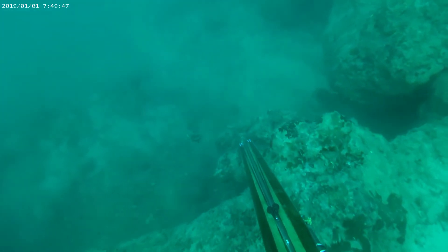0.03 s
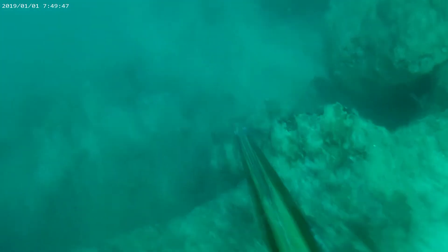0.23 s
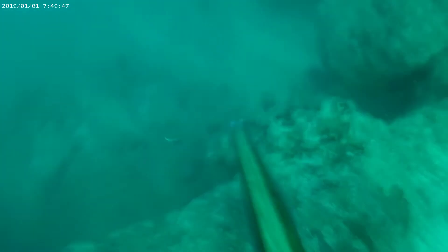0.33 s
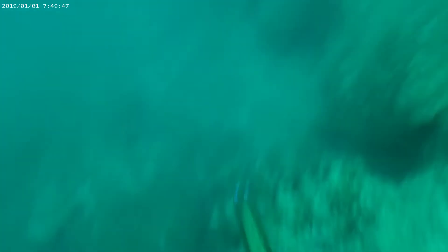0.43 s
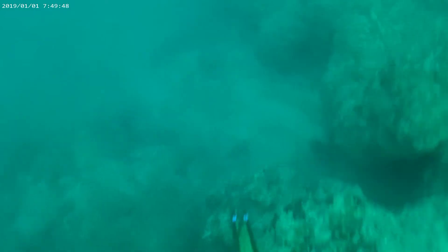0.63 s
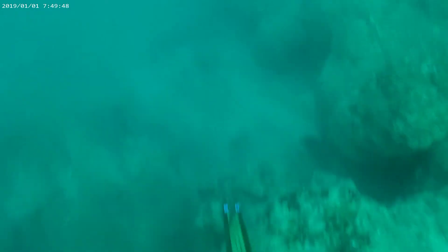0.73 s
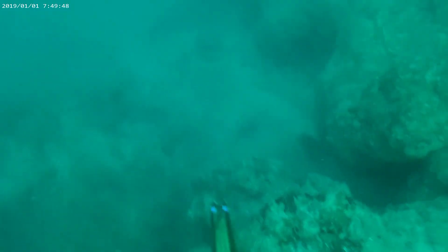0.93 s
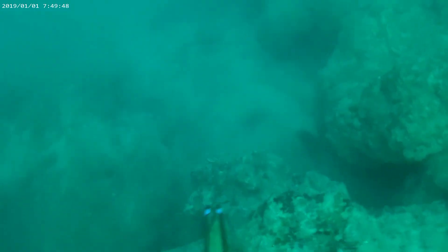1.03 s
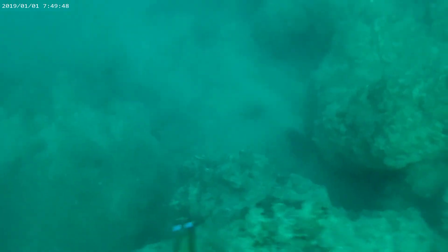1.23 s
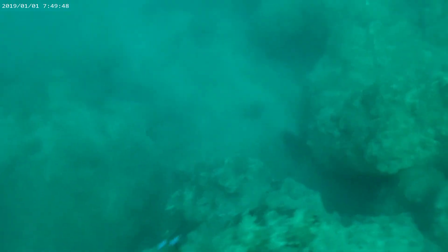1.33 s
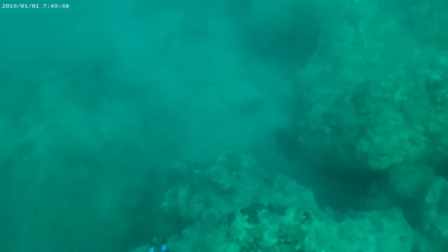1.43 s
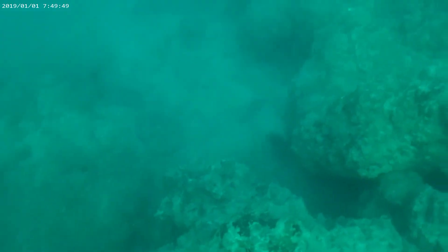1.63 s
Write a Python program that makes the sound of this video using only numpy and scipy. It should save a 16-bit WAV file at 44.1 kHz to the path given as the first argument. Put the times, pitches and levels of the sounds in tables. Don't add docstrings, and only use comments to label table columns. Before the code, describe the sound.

A speargun fires underwater: click, quick scrape and one loud distorted crack, then fading rattles and knocks.

```python
import sys
import numpy as np
from scipy import signal
from scipy.io import wavfile

SR = 44100
rng = np.random.default_rng(int(sys.argv[2]) if len(sys.argv) > 2 else 0)


def store_wav(level_fs):
    pcm = np.round(np.clip(np.atleast_2d(level_fs), -1, 1) * 32767)
    wavfile.write(sys.argv[1], SR, pcm.T.astype(np.int16))


def voltage_ratio(decibels):
    exponent = np.asarray(decibels, float) / 20
    return 10 ** exponent


N = 74970
T = np.arange(N) / SR

# f/Hz, level/dB, time to fall 60 dB/s
LOW_MODES = [(87, -5.5, 0.067), (160, -6.5, 0.36), (230, -16.5, 0.046), (393.6, -0.5, 0.089),
             (537.4, -5.5, 0.099), (662, -1.5, 0.036)]
# f/Hz, level/dB, time to fall 60 dB/s
MID_MODES = [(983, -14.5, 0.0028), (1246, -6.5, 0.027), (1386, -2.5, 0.028), (1618, 1, 0.023),
             (1813, -4, 0.021), (1965, -9, 0.011), (2434, -11, 0.0056)]
SCRAPE_TOP_HZ = 7114


def rms_one(x):
    return x / np.sqrt(np.mean(x ** 2) + 1e-20)


def curve(rows, size=1):
    rows = np.array(rows)
    return voltage_ratio(np.interp(T, rows[:, 0], rows[:, size], -120, -120))


def drift(rate):
    r = np.exp(-2 * np.pi * rate / SR)
    wander = signal.lfilter([1], [1, -2 * r, r * r], rng.standard_normal(N + SR))
    return rms_one(wander[SR:])


def ring(x, hz, t60):
    r = voltage_ratio(-60 / (t60 * SR))
    w = 2 * np.pi * hz / SR
    return signal.lfilter([0, np.sin(w)], [1, -2 * r * np.cos(w), r * r], x + 1e-18)


def body(x, modes):
    return sum((-1) ** k * voltage_ratio(db) * ring(x, hz, t60) for k, (hz, db, t60) in enumerate(modes))


def cut(x, hz, kind, order=2):
    return signal.sosfilt(signal.butter(order, hz, kind, fs=SR, output="sos"), x)


def grains(per_s, spread_db):
    size = voltage_ratio(spread_db * np.minimum(rng.exponential(1, N), 4)) * rng.choice([-1, 1], N)
    return rms_one(size * (rng.random(N) < per_s / SR))


def bursts(rows):
    out = np.zeros(N)
    noise = grains(12000, 2.8)
    for s, db, length in rows:
        t = T - s
        fade = np.exp(-np.maximum(t, 0) / max(length, 2e-4))
        hit = noise * fade * np.clip(t / 4e-4, 0, 1)
        out += voltage_ratio(db) * hit / np.sqrt(np.sum(hit ** 2) + 1e-20)
    return out


def damped_swings(times, rows):
    out = np.zeros(N)
    for s, (db, hz, t60) in zip(times, rows):
        t = np.maximum(T - s, 0)
        out += voltage_ratio(db - 60 * t / t60) * np.sin(2 * np.pi * hz * t) * np.minimum(t / .002, 1)
    return out


def rattle(x):
    # f/Hz, sharpness Q, added gain
    peaks = [(4094, 9.8, 4.5), (5780, 8, 3.1), (7700, 17, 0.99), (12540, 2.5, 3.2)]
    crack = cut(cut(x, 2300, "high"), 4900, "low")
    return crack + sum(gain * signal.lfilter(*signal.iirpeak(hz, q, SR), crack) for hz, q, gain in peaks)


def slam():
    # f/Hz, level/dB, time to fall 60 dB/s
    tones = [(396.3, 2.5, 0.018), (534.4, -5.5, 0.087), (157, -10.5, 0.19), (82.5, -9, 0.058),
             (381.4, -16.5, .13)]
    start_s, attack_s, hold_s = .2903, 0.0015, .0165
    pitch_wobble, rough_db = .006, 2.5
    t = np.maximum(T - start_s, 0)
    out = 0
    for hz, db, t60 in tones:
        phase = 2 * np.pi * hz * np.cumsum((1 + pitch_wobble * drift(60)) * (t > 0)) / SR
        fade_db = -60 * np.maximum(t - hold_s, 0) / t60
        out = out + voltage_ratio(db + fade_db + rough_db * drift(80)) * np.sin(phase)
    return out * np.minimum(t / attack_s, 1)


def pushes():
    starts = [.2268, .238, .3385, .4072, .422, .526]
    # peak level/dB, f/Hz, time to fall 60 dB/s
    swings = [(-5.5, 114, 0.038), (-8, 35, 0.088), (-4, 160, 0.018), (-4.5, 72, 0.016), (-20, 250, 0.018),
              (-27, 116, 0.018)]
    return damped_swings(starts, swings)


def slide():
    # t/s, level/dB, treble level/dB
    scrape = [(.232, -35, -36.5), (.2425, -37.5, -43.5), (.245, -36, -73), (.2485, -29, -41.5),
              (.265, -20, -37), (.277, -18, -33.5), (.284, -16.5, -30.5), (.290, -8.5, -24),
              (.296, -25.5, -26.5)]
    x = grains(3000, 4.8)
    mix = rms_one(body(x, MID_MODES)) + voltage_ratio(-11) * rms_one(body(x, LOW_MODES))
    treble = rms_one(cut(rattle(x), SCRAPE_TOP_HZ, "low"))
    return curve(scrape) * mix + curve(scrape, size=2) * treble


def slips():
    # t/s, level/dB, burst length/s
    events = [(.2372, -30.5, .001), (.242, -27.5, .001), (.2464, -29.5, .001), (.253, -19, .0012),
              (.2608, -21.5, .0015), (.2665, -12.5, .002), (.2683, -13, .001), (.2716, -10.5, .0015),
              (.2748, -17, .0015), (.2785, -15, .0015), (.2825, -17.5, .0015), (.2855, -8, .002),
              (.2875, -2.5, .001)]
    # f/Hz, level/dB, time to fall 60 dB/s
    modes = [(1315, -8.5, .025), (1460, -8, 0.043), (1594, 1, 0.032), (1751, -0.5, 0.018),
             (2030, -9.5, 0.024)]
    return body(bursts(events), modes)


def trigger():
    # t/s, level/dB, burst length/s
    clicks = [
        (.2248, -32, 0.003),
        (.2285, -26, 0.0017),
        (.2316, -8.5, 0.0023),
        (.2385, -26, 0.00076),
    ]
    # f/Hz, level/dB, time to fall 60 dB/s
    high_modes = [(3920, -1, 0.0076), (5500, -6, 0.0099), (6414, -17.5, .008), (8050, -4, 0.003),
                  (9750, -15.5, 0.0023), (11100, -11.5, .0025)]
    sear = bursts(clicks)
    low = body(voltage_ratio(-12.5) * sear, LOW_MODES[2:])
    return body(sear, high_modes) + body(voltage_ratio(-5.5) * sear, MID_MODES) + low


def ticks():
    # t/s, treble peak level/dB, burst length/s, middle-mode level against treble/dB
    events = [(.1505, -58.5, 0.0013, -4), (0.2738, -26, 0.0018, 18.5), (0.2802, -21.5, .001, -5),
              (0.2828, -24, .001, -14), (0.309, -30, .001, -1), (0.3974, -44.5, 0.00092, 16.5),
              (0.3239, -41, .002, -7.5), (0.4222, -51, .002, -9), (.469, -56, .002, -4),
              (0.869, -55.5, 0.0024, 1.5), (1.417, -63.5, 0.0018, 2.5), (1.626, -56, 0.0019, 6.5),
              (0.2894, -3, 0.003, 1), (0.2972, -27, 0.0027, 6), (0.301, -14, 0.0034, 6),
              (0.312, -19, 0.00255, 4), (0.333, -28.5, 0.0013, 7.5), (0.3371, -30, 0.0029, 5.5),
              (0.3411, -25, 0.0018, -17), (0.3465, -22, 0.0017, -7), (0.353, -34, 0.0018, 4),
              (0.3637, -31, 0.0022, -4), (0.3783, -35, 0.0018, -2.5), (0.3855, -38.5, 0.0022, -2),
              (0.4007, -29.5, 0.0034, -7.5), (0.409, -33.5, 0.0034, -3), (0.4131, -41, .003, -12),
              (0.446, -42, 0.005, -11), (0.4556, -39, 0.0059, 2), (0.5212, -48.5, 0.0028, 0.5),
              (0.6909, -45, 0.0023, -7.5), (0.899, -51, 0.0016, -6), (0.9392, -56.5, .004, 1.5),
              (1.2726, -53, .002, 2.5), (1.2898, -60, .002, 15.5), (1.385, -47, 0.0092, 4),
              (1.4012, -50.5, 0.017, 6), (1.4466, -50.5, 0.0029, 4.5), (1.521, -54.5, .0035, 1),
              (1.688, -48.5, 0.0047, 5.5)]
    far_from_s, far_top_hz, far_db = .5, 4800, 2.5
    hard = bursts([(s, db + 11, length) for s, db, length, _ in events])
    middle = bursts([(s, db + mid_db - 3, length) for s, db, length, mid_db in events])
    near = T < far_from_s
    far = voltage_ratio(far_db) * cut(hard * ~near, far_top_hz, "low", order=4)
    low = body(voltage_ratio(-1) * middle * near, LOW_MODES[2:])
    return rattle(hard * near + far) + body(middle, MID_MODES) + low


def taps():
    # t/s, peak level/dB
    events = [(0.3206, -25.5), (0.3734, -35.5), (0.4234, -54), (0.7339, -49.5), (0.821, -56.5),
              (0.855, -53.5), (0.8683, -47), (.896, -56), (0.925, -54), (0.961, -52), (0.9984, -54.5),
              (1.0368, -59), (1.1511, -49.5), (1.2173, -53.5), (1.276, -50), (1.3244, -53.5),
              (1.3497, -52.5), (1.4134, -47), (1.486, -48), (1.4996, -48.5), (1.518, -44.5),
              (1.5314, -53.5), (1.563, -58.5), (1.5711, -50.5), (1.6095, -49.5), (1.6242, -45),
              (1.634, -41.5), (1.6454, -43), (1.661, -49), (1.6712, -48.5)]
    # f/Hz, level/dB, time to fall 60 dB/s
    modes = [(1230, -6.5, 0.03), (1390, -5, 0.018), (1660, 1, .025), (1920, -1.5, 0.03), (2024, -7, 0.01)]
    dull = bursts([(s, db - 4, 0.0041) for s, db in events])
    return body(dull, modes) + body(voltage_ratio(-11.5) * dull, LOW_MODES[2:])


def bumps():
    # t/s, level/dB, burst length/s
    events = [(.356, -20.5, .001), (.372, -26.5, 0.00053), (.402, -32, 0.0018), (.409, -25, 0.0024),
              (.4245, -40, 0.00091), (.4585, -34, 0.0019), (.543, -38.5, 0.0036), (.560, -41.5, 0.0036),
              (.574, -37, 0.0031), (.590, -38, 0.0042), (.601, -47, .003), (.616, -41, 0.0035),
              (.664, -51, 0.0016), (.683, -47.5, 0.0032), (.848, -46, 0.00077), (1.337, -56, 0.0021),
              (1.497, -45.5, .003), (1.530, -43.5, 0.0033)]
    # f/Hz, level/dB, time to fall 60 dB/s
    modes = [(376.6, 0, 0.053), (544, -3, 0.065), (638, -1.5, 0.013)]
    return body(bursts(events), modes)


def pings():
    starts = [.4575, 1.647, .937, .7345, 1.05, .3128]
    # level/dB, f/Hz, time to fall 60 dB/s
    rings = [(-49, 1300, 0.025), (-49, 3230, 0.023), (-32.5, 680, 0.026), (-39, 605, 0.13),
             (-42.5, 540, .045), (-11, 770, 0.014)]
    return damped_swings(starts, rings)


def squeak():
    # start t/s, length/s, level/dB, from f/Hz, to f/Hz, fade/dB
    glide = (.459, .034, -46.5, 1600, 1665, -6)
    s, length, db, from_hz, to_hz, fade_db = glide
    u = np.clip((T - s) / length, 0, 1)
    phase = 2 * np.pi * np.cumsum(from_hz + (to_hz - from_hz) * np.sqrt(u)) / SR
    edges = np.clip(10 * np.minimum(u, 1 - u), 0, 1)
    return voltage_ratio(db + fade_db * u + 2 * drift(90)) * edges * np.sin(phase)


def knocks():
    # t/s, level/dB, direction (-1 press, 1 rebound)
    events = [
        (0.7539, -18, -1),
        (0.7637, -21, 1),
        (.7720, -29.5, 1),
        (1.603, -14.5, -1),
        (1.6085, -18, -1),
    ]
    # f/Hz, level/dB, time to fall 60 dB/s
    modes = [(136, -2.5, 0.029), (223.7, -7.5, 0.03), (406.7, -2.5, 0.028), (511.6, -2.5, 0.04),
             (633, -8, 0.029)]
    contact_hz = 500
    out = np.zeros(N)
    for s, db, direction in events:
        pulse = np.exp(-.5 * ((T - s) * 2 * np.pi * contact_hz) ** 2)
        push = pulse / pulse.sum()
        out += np.sign(direction) * sum(voltage_ratio(db + mode_db) * ring(push, hz, t60) for hz, mode_db, t60 in modes)
    return cut(cut(out, 755, "low", order=4), 109.7, "high", order=1)


def rubbing():
    # t/s, hollow tone level/dB, level of the tones around it/dB
    strength = [(0, -90, -72.5), (.2, -86, -66.5), (.3, -33, -27.5), (.45, -51, -49), (.51, -64, -61),
                (.55, -58, -49.5), (.61, -59, -59), (.65, -62, -58.5), (.84, -63, -64), (.875, -46, -66),
                (.93, -64.5, -71), (1.1, -66, -61.5), (1.36, -67.5, -58), (1.4, -46, -63),
                (1.5, -56, -58.5), (1.59, -58.5, -65), (1.64, -47.5, -59.5), (1.7, -53, -68.5)]
    hollow_hz, hollow_noise_db = 404, -9
    rough = rms_one(ring(grains(1500, 1.3), 360, 0.037))
    hollow = rms_one(np.sin(2 * np.pi * hollow_hz * T) + voltage_ratio(hollow_noise_db) * rough)
    # f/Hz, level/dB, time to fall 60 dB/s
    nearby_modes = [(220, -1.0, 0.069), (278, -1, 0.055), (508, 3.0, 0.042),
                    (546, -1.0, 0.064), (624, -3.5, 0.076), (758, -12.5, .04)]
    nearby = rms_one(body(grains(950, 0.54), nearby_modes))
    clicks = rms_one(body(grains(510, 2.5), MID_MODES))
    return curve(strength) * hollow + curve(strength, size=2) * (voltage_ratio(2.5) * nearby + voltage_ratio(-20.0) * clicks)


def fizz():
    # t/s, level/dB
    strength = [(.3, -33), (.35, -47), (.41, -48.5), (.44, -60.5), (.48, -65), (.52, -74)]
    x = grains(3800, 5.6)
    treble = cut(rattle(x), SCRAPE_TOP_HZ, "low")
    return curve(strength) * rms_one(body(x, MID_MODES) + voltage_ratio(13.0) * treble)


def water():
    # t/s, level/dB
    surge = [
        (0.0, -64.5),
        (0.316, -42.5),
        (1.7, -52.5),
    ]
    top_hz, lump_db = 93, 2
    low = cut(cut(rng.standard_normal(N + SR), top_hz, "low", order=3), 15, "high")[SR:]
    return curve(surge) * voltage_ratio(2 + lump_db * drift(17)) * rms_one(low)


def electronics():
    # f/Hz, level/dB
    colour = [(88, -32), (150, -3.5), (662, -15.5), (887, -19.5), (1660, -21), (2450, -27), (4760, -30),
              (14800, -40.5), (16000, -52.5)]
    whine_hz, whine_width_hz = 4790, 50
    hum_hz, hum_t60_s = 664, .2
    hz, db = np.transpose(colour)
    edges = 140 * 2 ** np.arange(0, 7.1, .5)
    white = rng.standard_normal((2, N))
    hiss = 0
    for k, (low, high) in enumerate(zip(edges, edges[1:])):
        band_db = np.interp(np.log(low * high) / 2, np.log(hz), db)
        hiss = hiss + voltage_ratio(band_db) * cut(white[k % 2], [low, high], "band")
    top_hiss = cut(white[0, ::-1], 13000, "high")
    whine = ring(rng.standard_normal(N), whine_hz, np.log(1000) / np.pi / whine_width_hz)
    hum = ring(white[1, ::-1], hum_hz, hum_t60_s)
    all_hiss = voltage_ratio(-61) * rms_one(hiss) + voltage_ratio(-78) * rms_one(top_hiss)
    return all_hiss + voltage_ratio(-79) * rms_one(whine) + voltage_ratio(-68.5) * rms_one(hum)


def scene():
    shot = slam() + pushes() + slide() + slips() + trigger()
    loose_parts = ticks() + taps() + bumps() + pings() + squeak()
    handling = knocks() + rubbing()
    background = fizz() + water() + electronics()
    return (shot + loose_parts + handling + background)[None]


def band_limit(x):
    return signal.sosfilt(signal.butter(12, 15400, fs=SR, output="sos"), x)


def record(dry):
    clip_level, clip_hard = .72, 5.0
    x = dry / (0.5 + np.abs(dry / clip_level) ** clip_hard) ** (1 / clip_hard)
    x = cut(x, 14, "high", order=1)
    x = cut(x, 15900, "low", order=16)
    return band_limit(x - .0027)


dry = scene()
out = record(dry)
store_wav(out)
```